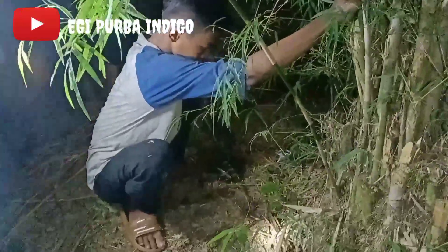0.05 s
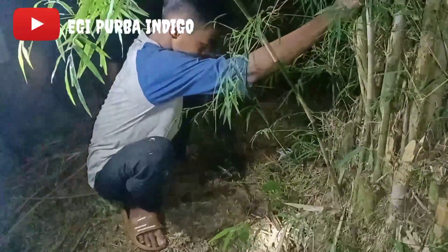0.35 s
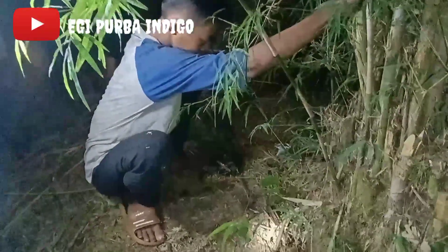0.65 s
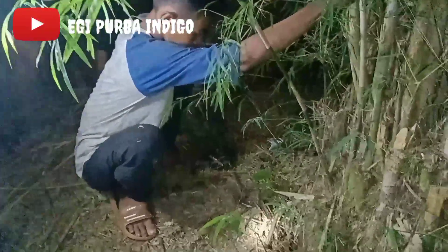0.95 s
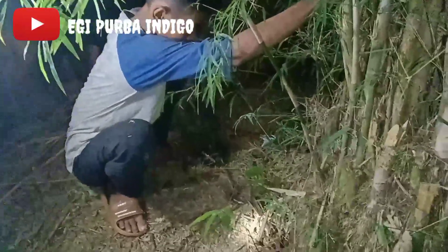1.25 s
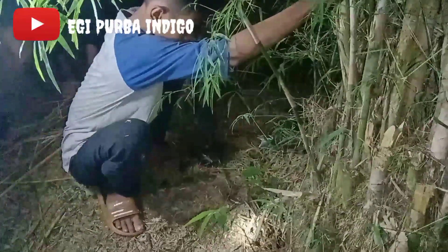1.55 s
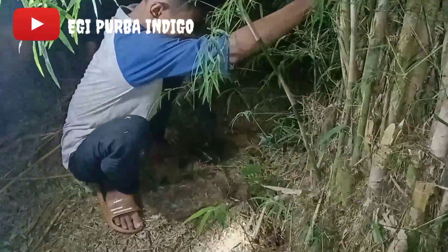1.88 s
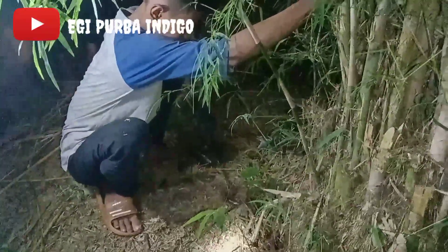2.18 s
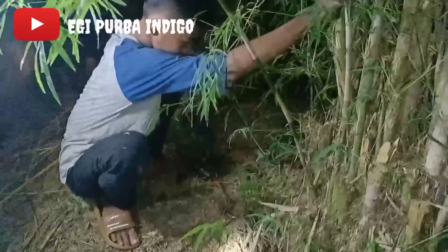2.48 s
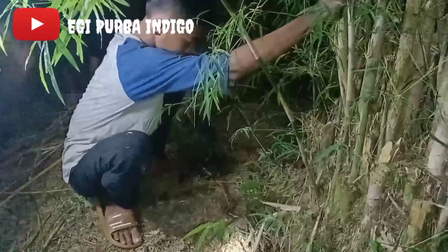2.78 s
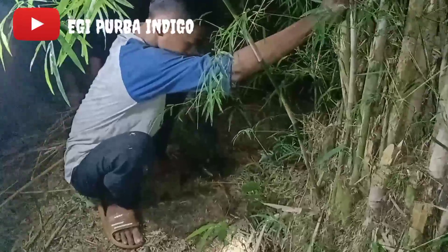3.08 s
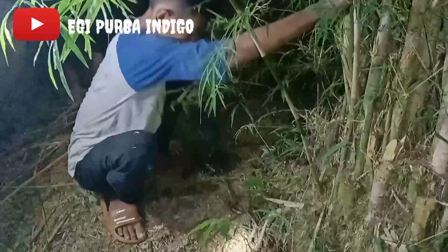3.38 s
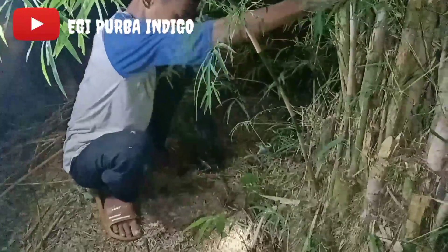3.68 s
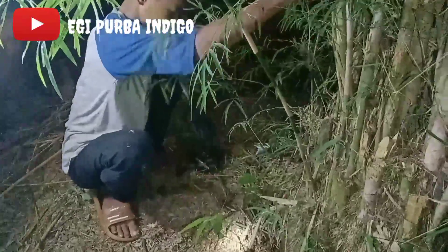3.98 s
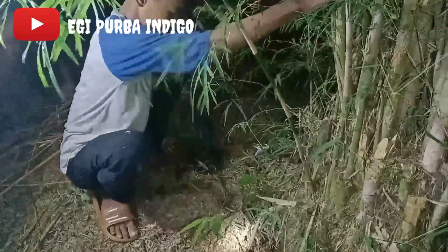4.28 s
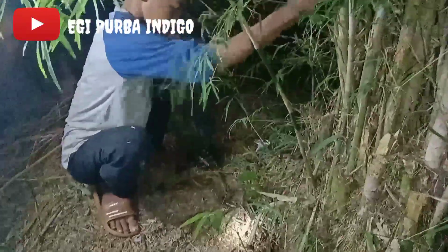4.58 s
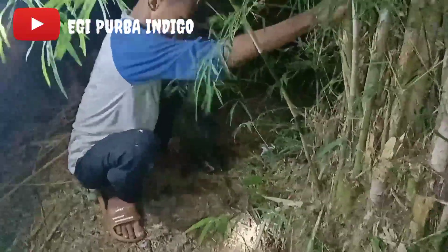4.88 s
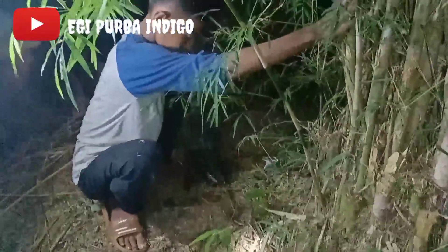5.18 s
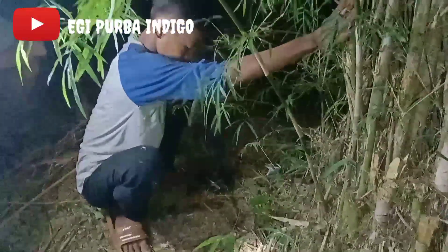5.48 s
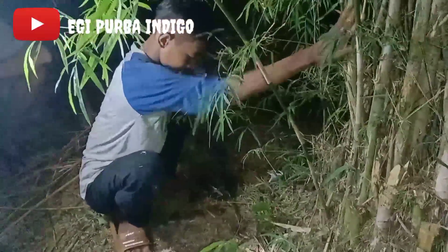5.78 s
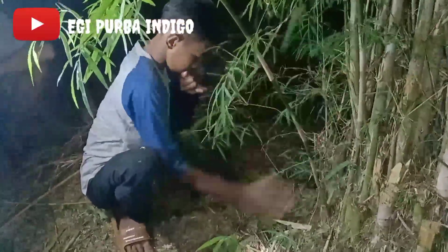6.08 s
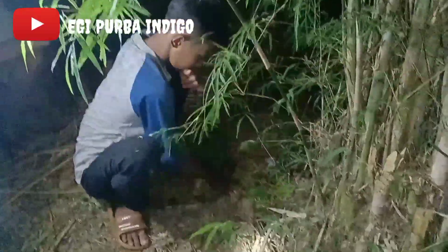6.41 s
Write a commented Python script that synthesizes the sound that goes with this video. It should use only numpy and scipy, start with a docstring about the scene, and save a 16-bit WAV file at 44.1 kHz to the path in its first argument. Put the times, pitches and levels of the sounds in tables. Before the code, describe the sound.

A dense, high insect chorus shrills steadily outdoors at night beside a bamboo clump. Frogs give short rattling calls, clear at the start, then fainter, then loudest just past the middle. A dull thud with a twig snap follows, then another snap. Near the end a hand brushes dry leaves close to the microphone, with sharp cracks and a knock on a hollow cane. A distant engine hums very faintly.

```python
"""A dense insect chorus shrills at night by a bamboo clump, countless wings merging into one band.
Small frogs rattle near and far in runs of vocal-sac pulses. A distant engine drones under faint calls,
chirps, squeaks and a swelling tone. A hand works among the stalks: dead leaves crackle in tiny fractures,
dry twigs snap and splinter, a knocked hollow cane rings. One dull thud echoes over the land."""
import sys
import numpy as np
from scipy import signal
from scipy.fft import rfft, irfft, next_fast_len
from scipy.io import wavfile

SR = 44100
rng = np.random.default_rng(int(sys.argv[2]) if len(sys.argv) > 2 else 0)


def master_out(mix):
    """Clip the mix to full scale and print it as 16-bit PCM to the path in sys.argv[1]."""
    frames = np.transpose(np.atleast_2d(mix))
    ceiling = np.clip(frames, -1, 1)
    pcm = np.round(ceiling * 32767).astype(np.int16)
    wavfile.write(sys.argv[1], SR, pcm)


N = 293265
TIME = np.arange(N) / SR

# chorus spectrum: (frequency [Hz], density [dB])
CHORUS_SPECTRUM = [(5600, -41), (5950, -27.5), (6150, -7), (6290, 0), (6500, 1), (6850, -1), (7170, 1.5),
                   (7550, -2), (8000, -9), (8550, -9), (9300, -19), (10400, -24.5), (11000, -45),
                   (13000, -46.5)]
# single insects and far groups:
# (centre [Hz], width [Hz], start level [dB], throb rate [Hz], throb depth [0-1], swell [dB], fade [dB/s])
SINGERS = [(6318, 53, -56.5, 31, 0.6, 1, 0.3), (7260, 250, -60.5, 76, 0.6, 2.5, -0.4),
           (6740, 500, -59, 58, 0.3, 1.5, 0.1), (3405, 227, -70, 17, 0.2, 4, .6),
           (2248, 156, -80, 15, 0.3, 2, 0.22)]
# still air and far noise: (frequency [Hz], density [dB])
AIR_SPECTRUM = [(25, -8.5), (55, -3.5), (110, 12.5), (170, 5), (250, -9), (380, -5), (520, -7.5),
                (900, -9.5), (1350, -4.5), (1900, -13.5), (2900, -22), (5300, -32.5), (11500, -19.5),
                (15000, -16.5)]
# murmur of the land: (frequency [Hz], gain [dB])
LAND_SPECTRUM = [(200, -12), (340, 8.5), (480, -10.5), (650, 2.5), (1300, 1.5), (1900, -18.5), (4000, -3)]
# engine envelope: (time [s], level [dB])
ENGINE_LEVEL = [(0.0, -74), (0.03, -69.5), (1.28, -69.5), (1.31, -60), (1.89, -61), (2.11, -69), (2.2, -57),
                (2.28, -72), (2.35, -50.5), (2.39, -68.5), (2.7, -55.5), (3.18, -62), (3.26, -54.5),
                (4.35, -64), (4.41, -53), (4.44, -72), (6.3, -64.5), (6.65, -70.5)]
# swells of the far tone: (peak time [s], half length [s], level [dB])
TONE_SWELLS = [(.8, .06, -75.5), (2.905, 0.066, -82), (4.024, 0.02, -66.5), (4.275, 0.077, -67)]
# frog calls: (time [s], length [s], relative pulse height [dB], pitch [Hz])
FROG_CALLS = [ (.01, 0.066, -46, 3510), (.175, 0.074, -47, 3450), (.372, 0.059, -45.5, 3420),
              (1.761, 0.028, -64, 3330), (1.898, 0.034, -68, 3140), (2.043, 0.028, -60, 3300),
              (2.18, .035, -57.5, 3320), (2.307, 0.058, -57.5, 3460), (2.457, .042, -56, 3400),
              (2.619, 0.047, -60, 3380), (2.757, 0.067, -59.5, 3330), (2.919, 0.035, -57, 3480),
              (3.098, 0.039, -58.5, 3450), (3.618, 0.051, -43, 3210), (3.661, 0.038, -33, 3510),
              (3.754, 0.033, -38.5, 3300), (3.833, 0.033, -31.5, 3450), (3.885, 0.02, -33.5, 3430),
              (3.996, 0.054, -30.5, 3460), (4.175, .044, -31.5, 3446), (4.328, 0.023, -38, 3340),
              (4.482, .023, -37, 3300), (4.65, 0.039, -59, 3170), (4.804, 0.025, -51, 3360),
              (4.96, 0.038, -51, 3360), (6.044, 0.037, -59, 3620), (6.139, .034, -60.5, 3600),
              (6.277, 0.038, -56.5, 3540), (6.502, .038, -53.5, 3520)]
# partials of a pulse: (frequency [x pitch], level [dB])
FROG_PARTIALS = [(.49, -31.5), (1.003, 2), (1.37, -19.5)]
# stalks' reflection of a call: (frequency [Hz], gain [dB])
FROG_ECHO_SPECTRUM = [(1200, -0.5), (1700, 5.5), (2600, -4), (3050, 3.5), (3250, -6), (3430, 3), (3690, 2),
                      (4100, -2.5), (4600, 0.5), (5200, -1)]
# throat and vocal sac resonances: (frequency [Hz], gain [dB])
FROG_THROAT = [(900, -15), (1300, -5.5), (1600, 10), (2050, -8.5), (2400, -5), (2800, 0), (3300, 1.5),
               (3900, -4.5), (4250, -1), (4600, 5), (5200, -1), (5800, -12.5), (7000, -21)]
# single far calls: (peak time [s], half length [s], pitch [Hz], level [dB])
FAR_CALLS = [(.56, 0.019, 1188, -66.5), (1.016, 0.04, 1657, -70.5), (1.806, 0.027, 3280, -65.5),
             (4.58, 0.086, 1030, -66), (4.995, 0.03, 1090, -65.5), (5.813, 0.059, 1460, -76.5),
             (6.16, .018, 3700, -63), (6.58, .018, 3700, -65)]
# far chirp bouts: (start [s], end [s], period [s], pitch [Hz], half length [s], peak [dB], peak time [s])
CHIRP_BOUTS = [(.71, 3.7, 0.2, 4320, 0.056, -77, 2.3), (4.434, 6.2, .272, 4500, 0.039, -70, 4)]
# rolling echoes: (peak time [s], rise [s], level [dB], fade [s])
ROLLS = [(.93, 0.18, -71.5, 0.46), (4.48, 0.074, -58, 0.35)]
# their spectrum: (frequency [Hz], gain [dB])
ROLL_SPECTRUM = [(150, -13), (330, -7.5), (520, -8), (750, -7), (1150, 0), (1450, 2), (1900, -23.5),
                 (3000, -12)]
# high squeaks: (time [s], level [dB])
SQUEAKS = [(1.59, -72), (1.87, -82), (3.14, -77.5), (3.98, -76)]
# hand strokes through leaves: (peak time [s], rise [s], level [dB], length [s])
BRUSHES = [(4.378, 0.029, -60, 0.085), (4.798, 0.0071, -54.5, 0.021), (5.97, 0.033, -67.5, .08),
           (6.087, 0.028, -60.5, .02), (6.382, 0.018, -42, 0.18)]
# dry leaf and twig spectrum: (frequency [Hz], gain [dB])
DRY_SPECTRUM = [(250, -7), (500, -14), (800, -3), (1700, -2.5), (2900, -3), (4000, -12), (4600, 2.5),
                (5150, 2.5), (5700, 2), (8500, 1), (11000, 0), (15500, 3)]
# thud impact: (time [s], level [dB])
THUD = [(4.375, -39.5)]
# thud modes: (frequency [Hz], level [dB], t60 [s])
THUD_MODES = [(95, -6, 0.12), (340, -8, 0.09), (740, -1.5, 0.043), (1446, -4.5, 0.063)]
# twig snaps: (time [s], crack level [dB], ring re crack [dB])
SNAPS = [(4.382, -26, -27), (4.7798, -24.5, -10), (6.079, -50, -28), (6.36, -29, -30), (6.372, -16.5, -27),
         (6.518, -31, -14)]
# twig modes: (frequency [Hz], level [dB], t60 [s])
TWIG_MODES = [(4740, -12, 0.018), (5170, -11, 0.056), (5600, -11, 0.024)]
# cane knocks: (time [s], level [dB])
KNOCKS = [(6.3661, -26), (6.3735, -40)]
# cane modes: (frequency [Hz], level [dB], t60 [s])
CANE_MODES = [(994, -10, 0.05), (1110, 0.5, 0.02), (1700, -5.5, 0.021), (2600, -18, 0.024)]


def from_db(db):
    """Decibels to gain."""
    return 10 ** (np.asarray(db) / 20)


def unit_rms(x):
    """Scale to rms 1."""
    return x / np.sqrt(np.mean(x ** 2) + 1e-20)


def butter(x, hz, kind, order=2):
    """Butterworth filter."""
    return signal.sosfilt(signal.butter(order, hz, kind, fs=SR, output="sos"), x)


def colour(x, spectrum):
    """Minimum-phase filter from (frequency [Hz], gain [dB]); white noise keeps its power."""
    size = next_fast_len(N + 8192)
    hz, db = np.transpose(spectrum)
    log_hz = np.log(np.fft.rfftfreq(size, 1 / SR) + 1)
    gain = unit_rms(from_db(np.interp(log_hz, np.log(hz), db)))
    cepstrum = irfft(np.log(gain), size)
    cepstrum[1:size // 2] *= 2
    cepstrum[size // 2 + 1:] = 0
    return irfft(rfft(x, size) * np.exp(rfft(cepstrum)), size)[:N]


def noise(spectrum):
    """Coloured noise; rms 1."""
    return unit_rms(colour(rng.standard_normal(N), spectrum))


def drift(rate_hz):
    """Smooth random wander; rms 1."""
    pole = np.exp(-80 * np.pi * rate_hz / SR)
    slow = signal.lfilter([1], [1, -2 * pole, pole * pole], rng.standard_normal(N // 40 + 2002))[2000:]
    return np.interp(np.arange(N) / 40, np.arange(len(slow)), unit_rms(slow))


def wavering_sine(hz, spread, drift_hz):
    """Sine whose frequency wanders by the fraction `spread`."""
    return np.sin(2 * np.pi * np.cumsum(hz * (1 + spread * drift(drift_hz))) / SR)


def bell(peak_s, half_s):
    """Gaussian swell; height 1."""
    return np.exp(-np.minimum(((TIME - peak_s) / half_s) ** 2 / 2, 50))


def multipath_noise(spectrum, swell_db):
    """Noise arriving by many paths: each third octave swells on its own; rms 1."""
    white, out = rng.standard_normal((2, N)), 0
    edges_hz = np.geomspace(140, 4500, 16)
    for k, band_hz in enumerate(zip(edges_hz, edges_hz[1:])):
        out += from_db(swell_db * drift(7.3)) * butter(white[k % 2], band_hz, "band")
    return unit_rms(colour(out, spectrum))


def blurred(hz, blur=0.018, spread_hz=25):
    """A pitch smeared by echoes into a narrow band; rms 1."""
    half_hz = hz * blur / 2 + spread_hz
    return unit_rms(butter(rng.standard_normal(N), [hz - half_hz, hz + half_hz], "band"))


def strikes(rows):
    """One click per (time [s], level [dB])."""
    out = np.zeros(N)
    for s, db in rows:
        out[int(s * SR)] += from_db(db)
    return out


def ring(clicks, modes):
    """Clicks excite damped modes."""
    out = 0
    for hz, db, t60_s in modes:
        r, w = np.exp(-np.log(1000) / (t60_s * SR)), 2 * np.pi * hz / SR
        out += from_db(db) * signal.lfilter([0, np.sin(w)], [1, -2 * r * np.cos(w), r * r], clicks + 1e-18)
    return out


def grove(x, t60_s):
    """Scatter from stalks and ground: many small decaying echoes; unit energy."""
    t = TIME[:SR // 2]
    echoes = rng.standard_normal(len(t)) * (rng.random(len(t)) < 2500 / SR) * (t > .002)
    echoes *= np.exp(-np.log(1000) * t / t60_s)
    return signal.fftconvolve(x, echoes / np.linalg.norm(echoes))[:N]


def insects(chorus_db=-48.5, shimmer_db=0.63):
    """Countless wings merge into one shrill band; a few singers and far groups throb out of it."""
    out = from_db(chorus_db + shimmer_db * drift(12)) * noise(CHORUS_SPECTRUM)
    for hz, width_hz, db, throb_hz, depth, swell_db, fade_db_per_s in SINGERS:
        throb = 1 + depth * wavering_sine(throb_hz, spread=0.0828, drift_hz=1.816)
        band = butter(rng.standard_normal(N), [hz - width_hz / 2, hz + width_hz / 2], "band")
        swell = from_db(swell_db * drift(5.3))
        out += from_db(db - fade_db_per_s * TIME) * unit_rms(band * throb * swell)
    return out


def night_air(air_db=-72, land_db=-82):
    """Steady air noise and a patchy murmur from the land."""
    land = from_db(land_db) * multipath_noise(LAND_SPECTRUM, swell_db=10)
    return from_db(air_db) * noise(AIR_SPECTRUM) + land


def engine(firing_hz=84.1, roughness=0.26, waver_db=2.5):
    """A far engine drones at its wavering firing rate."""
    drone = wavering_sine(firing_hz, spread=0.032, drift_hz=10.4)
    drone *= (1 + roughness * drift(42)) * from_db(waver_db * drift(5.9))
    return from_db(np.interp(TIME, *np.transpose(ENGINE_LEVEL))) * unit_rms(drone)


def far_tone(hz=419, floor_db=-89):
    """A faint unsteady tone swells now and then."""
    envelope = from_db(floor_db) + sum(from_db(db) * bell(s, half_s) for s, half_s, db in TONE_SWELLS)
    return envelope * unit_rms(wavering_sine(hz, spread=0.0406, drift_hz=46.2))


def frog_call(length_s, db, hz, thinning_db, pulse_hz=305, rise_s=.0006, edge_db=6.5, uneven_db=1.5,
              slowing=.16, jitter=0.02, pitch_fall=0.061, pitch_wobble=0.021):
    """A run of vocal-sac tone pulses, strongest mid-call, slowing and sinking in pitch."""
    t = TIME[:SR // 150]
    gap_noise, height_noise, pitch_noise = rng.standard_normal((3, 40, 1))
    rate_hz = pulse_hz * (1 + .07 * rng.standard_normal())
    progress = np.minimum(np.arange(40)[:, None] / (rate_hz * length_s), 1)
    onset_s = np.cumsum(1 + slowing * (progress - .5) + jitter * gap_noise, axis=0) / rate_hz
    onset_s -= onset_s[0]
    from_middle = onset_s / length_s - .5
    height = from_db(db - edge_db * (2 * from_middle) ** 2 + uneven_db * height_noise)
    pitch_hz = hz * (1 - pitch_fall * from_middle + pitch_wobble * pitch_noise)
    tone = sum(from_db(partial_db - thinning_db * max(1 - k, 0)) * np.sin(2 * np.pi * k * pitch_hz * t)
               for k, partial_db in FROG_PARTIALS)
    envelope = t / rise_s * np.exp(1 - t / rise_s)
    pulses = height * (onset_s < length_s) * envelope * tone
    samples = (onset_s * SR).astype(int) + np.arange(len(t))
    return np.bincount(samples.ravel(), pulses.ravel(), SR // 8)


def frogs(reference_db=-48.5, echo_db=1.5, echo_db_per_db=.27, near_echo_db=-9, gain_db=-8.5):
    """Frogs call among the stalks; weaker calls are farther off, thinner and richer in echo."""
    direct, scattered = np.zeros((2, N))
    for s, length_s, db, hz in FROG_CALLS:
        start, loss_db = int(s * SR), reference_db - db
        call = frog_call(length_s, db, hz, thinning_db=0.41 * loss_db)[:N - start]
        span = slice(start, start + len(call))
        direct[span] += call
        scattered[span] += from_db(echo_db + echo_db_per_db * loss_db) * call
    direct += from_db(near_echo_db) * grove(direct, t60_s=0.026)   # nearest stalks fill the pulse gaps
    echo = colour(grove(scattered, t60_s=0.29), FROG_ECHO_SPECTRUM)
    return from_db(gain_db) * colour(direct + echo, FROG_THROAT)


def far_calls(fade_db_per_s=3.5):
    """Soft swells blurred by distance: single calls, and even chirps in bouts that grow and fade."""
    out = sum(from_db(db) * bell(s, half_s) * blurred(hz) for s, half_s, hz, db in FAR_CALLS)
    for start_s, end_s, period_s, hz, half_s, db, peak_s in CHIRP_BOUTS:
        chirps = sum(from_db(db - fade_db_per_s * abs(s - peak_s)) * bell(s, half_s)
                     for s in np.arange(start_s, end_s, period_s))
        out += chirps * blurred(hz, blur=.06)
    return out


def rolling_echoes():
    """Far echoes arrive by many paths: smooth rise, exponential fade."""
    envelope = sum(from_db(db) * np.where(TIME < s, bell(s, rise_s), np.exp(-abs(TIME - s) / fade_s))
                   for s, rise_s, db, fade_s in ROLLS)
    return envelope * multipath_noise(ROLL_SPECTRUM, swell_db=3)


def squeaks(centre_hz=12800, rise_hz_per_s=24000, half_width_hz=450, half_s=.024):
    """Narrow hisses sweep upward, high above the chorus."""
    hiss = unit_rms(butter(rng.standard_normal(N), half_width_hz, "low"))
    out = 0
    for s, db in SQUEAKS:
        t = TIME - s
        sweep = np.sqrt(2) * np.sin(2 * np.pi * (centre_hz + rise_hz_per_s * t / 2) * t)
        out += from_db(db) * bell(s, half_s) * sweep
    return out * hiss


def hand_strokes(sag_db_per_s=97, settle_s=0.023):
    """Envelope of a hand brushing leaves: smooth rise, sag, quick settling."""
    out = 0
    for s, rise_s, db, length_s in BRUSHES:
        after_s = np.maximum(TIME - s, 0)
        settling = np.exp(-np.maximum(after_s - length_s, 0) / settle_s)
        out += from_db(db - sag_db_per_s * after_s) * np.where(TIME < s, bell(s, rise_s), settling)
    return out


def dead_leaves(fractures_per_s=7000, spread_db=2.5, clump_db=2, t60_cycles=9):
    """Brushed leaves break in clumps of tiny fractures; each rings its bit of leaf for a few cycles."""
    sizes = from_db(spread_db * np.minimum(rng.exponential(1, N), 4) + clump_db * drift(33))
    fractures = sizes * rng.choice([-1, 1], N) * (rng.random(N) < fractures_per_s / SR)
    modes_hz = np.geomspace(900, 15000, 24)
    mode_index = rng.choice(len(modes_hz), N, p=modes_hz / modes_hz.sum())
    crackle = sum(np.sqrt(hz) * ring(fractures * (mode_index == k), [(hz, 0, t60_cycles / hz)])
                  for k, hz in enumerate(modes_hz))
    return colour(hand_strokes() * unit_rms(crackle), DRY_SPECTRUM)


def thud(echo_db=-18):
    """One impact rings dull, damped modes; the grove echoes it."""
    body = ring(strikes(THUD), THUD_MODES)
    return body + from_db(echo_db) * grove(body, t60_s=0.41)


def twig_snaps(gap_s=.009, splinter_loss_db=9.5, tear_s=.002, tear_db=-14, echo_db=-12):
    """A crack and two weaker splinters; each tears fibres and rings the twig."""
    breaks = []
    for s, db, ring_db in SNAPS:
        gaps_s = gap_s * rng.uniform(.5, 1.5, 3)
        delays_s = np.cumsum(gaps_s) - gaps_s[0]
        breaks += [(s + delay_s, db - splinter_loss_db * k, ring_db) for k, delay_s in enumerate(delays_s)]
    cracks = strikes([(s, db) for s, db, _ in breaks])
    ringing = ring(strikes([(s, db + ring_db) for s, db, ring_db in breaks]), TWIG_MODES)
    tear_envelope = signal.lfilter([1], [1, -np.exp(-1 / (tear_s * SR))], cracks + 1e-18)
    snaps = cracks + ringing + from_db(tear_db) * tear_envelope * rng.standard_normal(N)
    return colour(snaps + from_db(echo_db) * grove(snaps, t60_s=0.14), DRY_SPECTRUM)


def cane_knocks(low_cut_hz=790, echo_db=-18):
    """Knocks ring a hollow cane, too thin to radiate bass."""
    cane = butter(ring(strikes(KNOCKS), CANE_MODES), low_cut_hz, "high", order=6)
    return cane + from_db(echo_db) * grove(cane, t60_s=0.41)


def scene():
    """All sources at one microphone, the same in both channels."""
    night = insects() + night_air() + engine() + far_tone()
    night += frogs() + far_calls() + rolling_echoes() + squeaks()
    return np.tile(night + dead_leaves() + thud() + twig_snaps() + cane_knocks(), (2, 1))


def record(dry, low_cut_hz=45, high_cut_hz=15550):
    """The small microphone sheds deep bass; the top is cut steeply."""
    high_cut = signal.ellip(10, .1, 80, high_cut_hz, fs=SR, output="sos")
    return signal.sosfilt(high_cut, butter(dry, low_cut_hz, "high"))


dry = scene()
out = record(dry)
master_out(out)
```